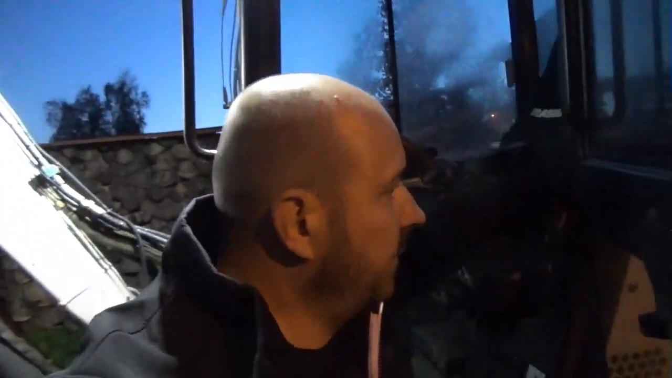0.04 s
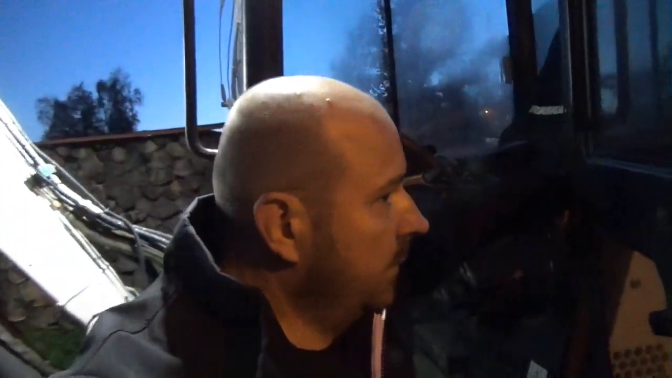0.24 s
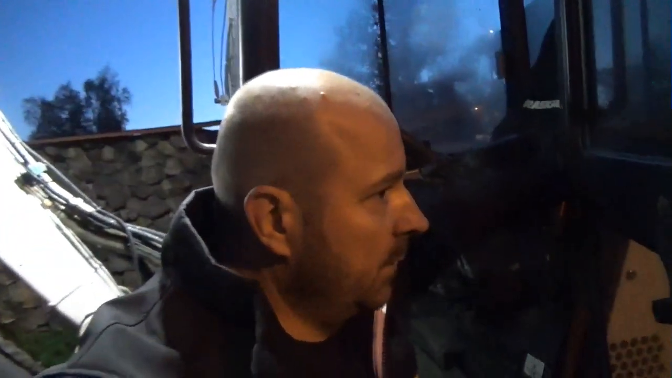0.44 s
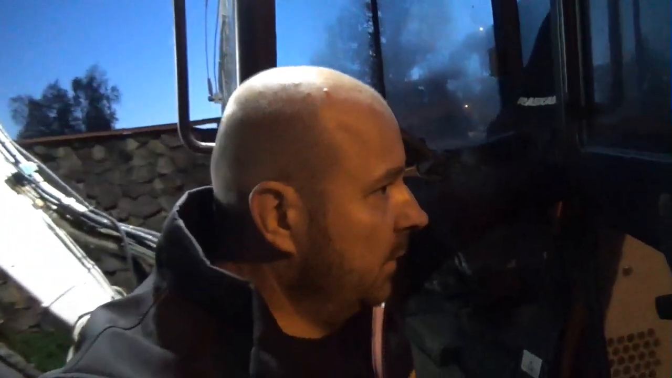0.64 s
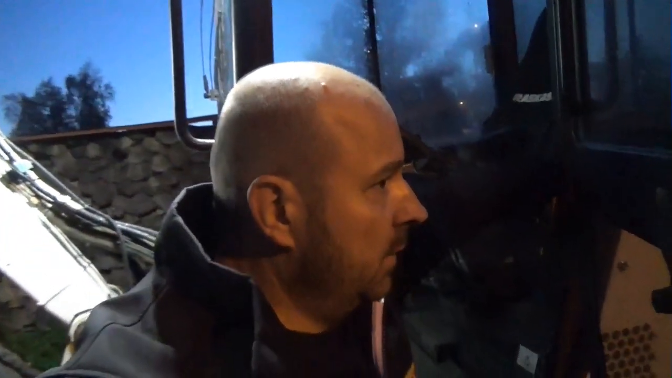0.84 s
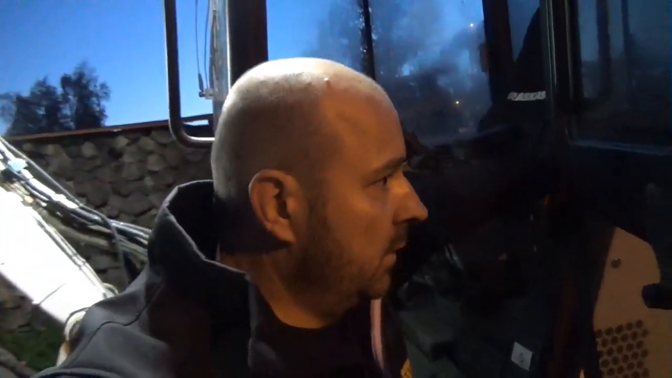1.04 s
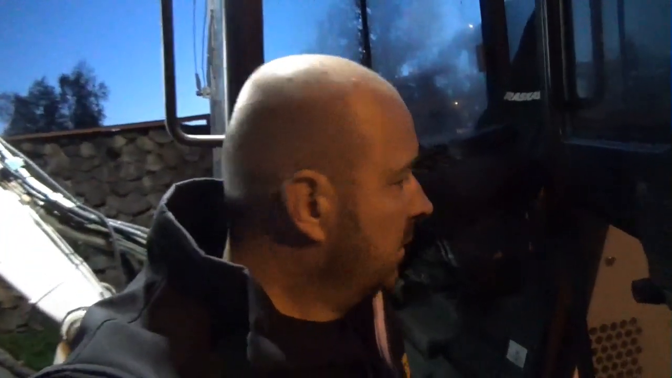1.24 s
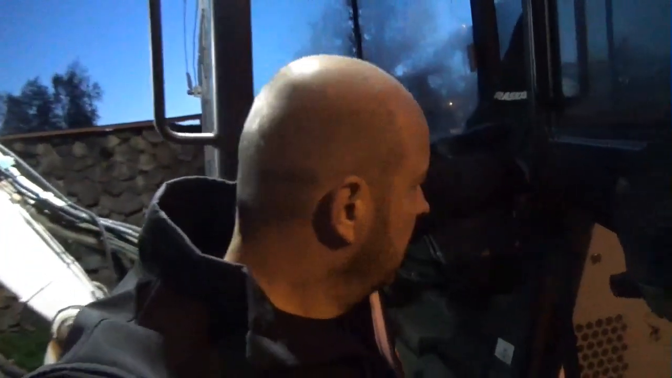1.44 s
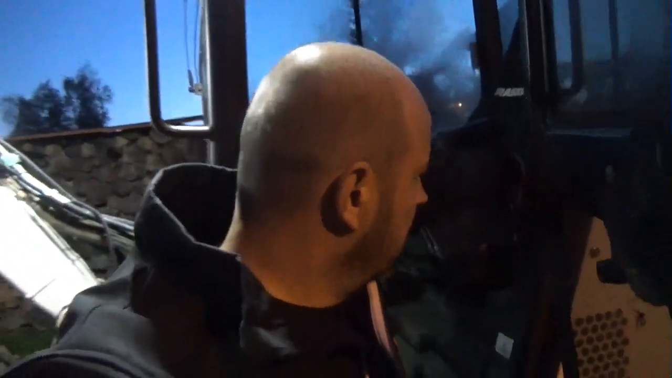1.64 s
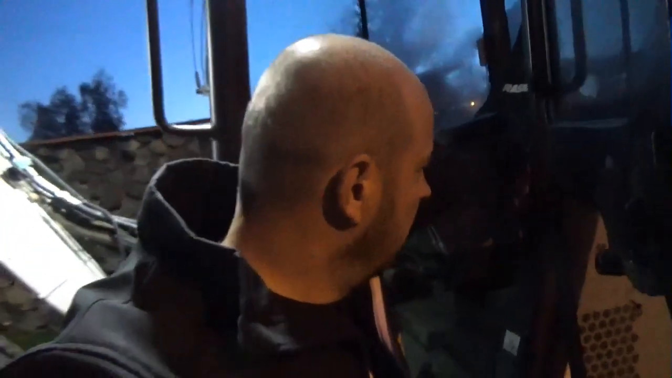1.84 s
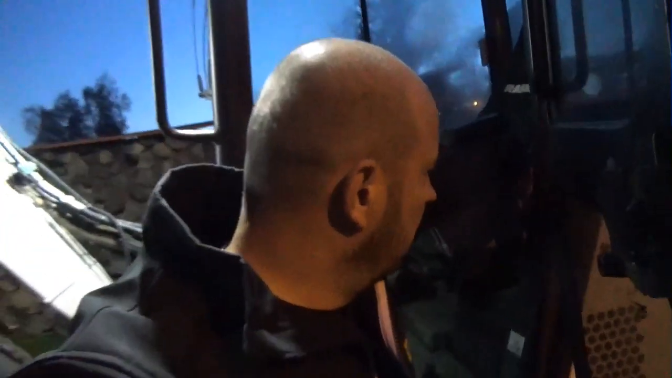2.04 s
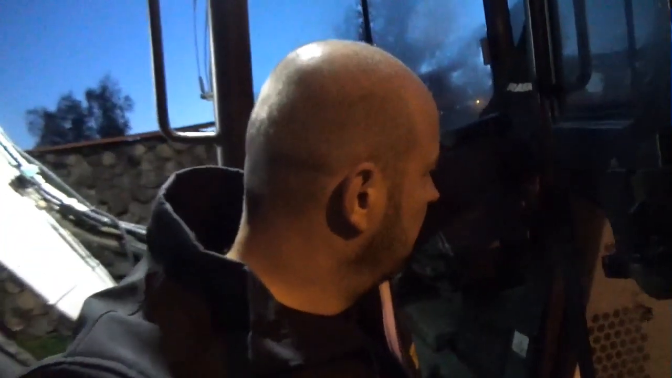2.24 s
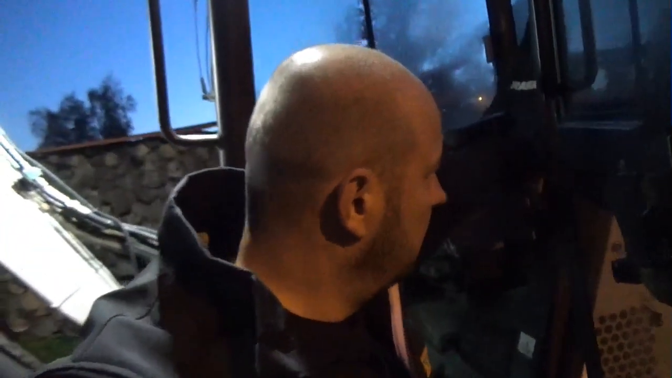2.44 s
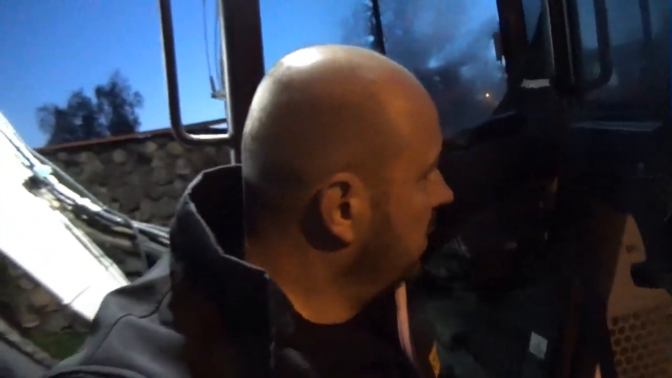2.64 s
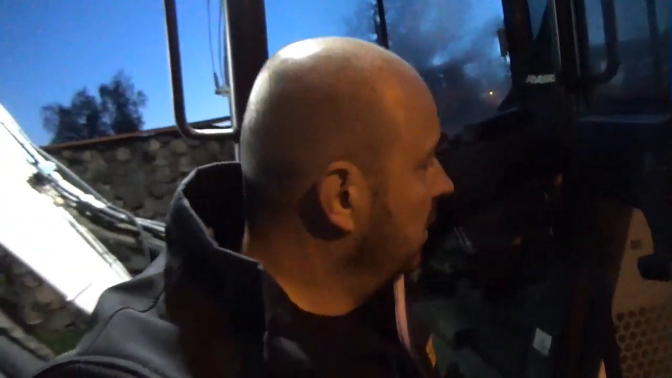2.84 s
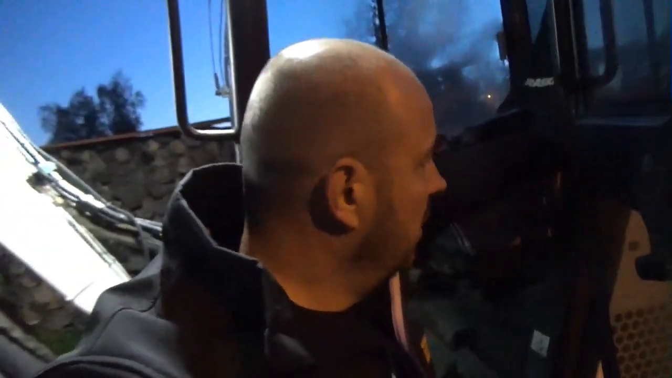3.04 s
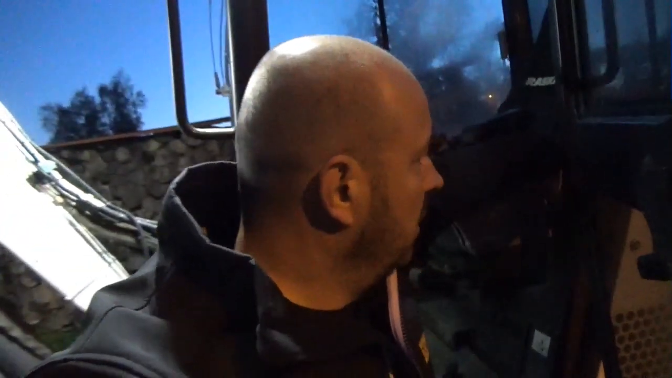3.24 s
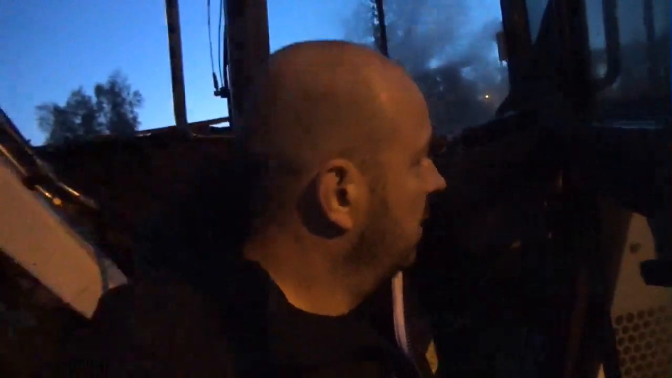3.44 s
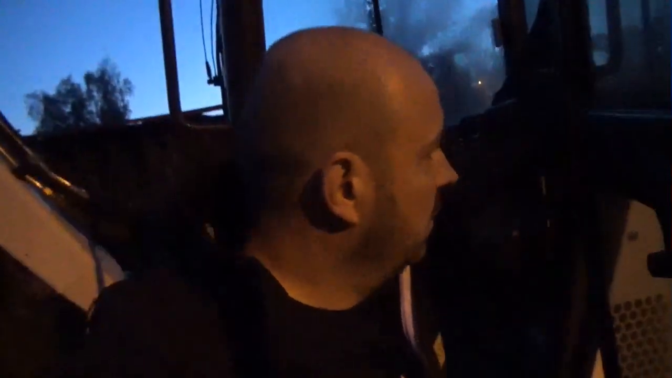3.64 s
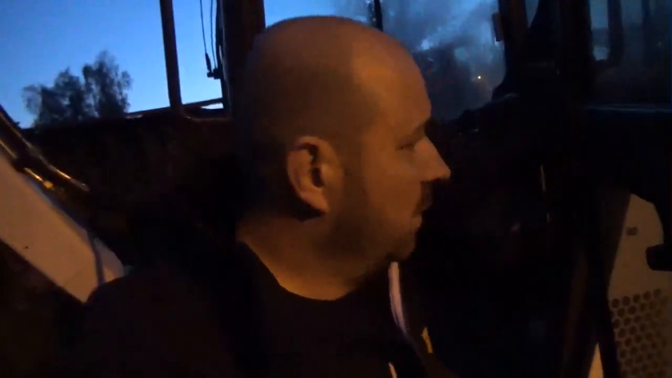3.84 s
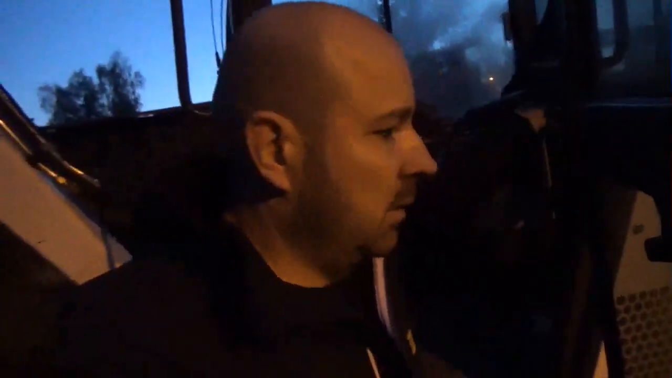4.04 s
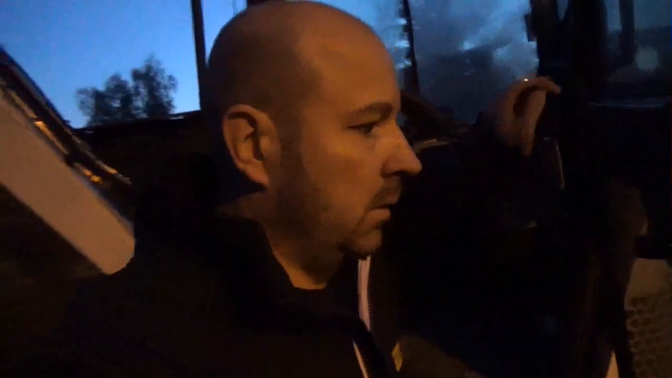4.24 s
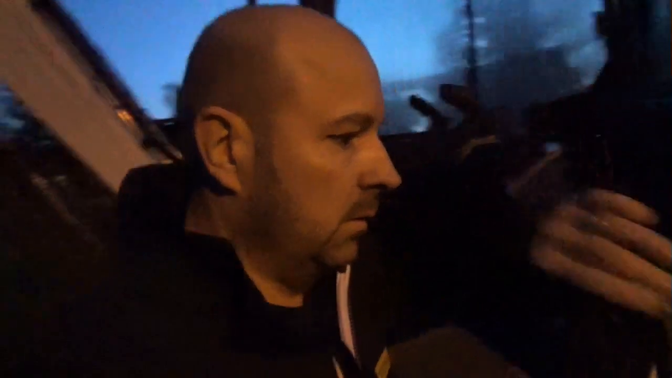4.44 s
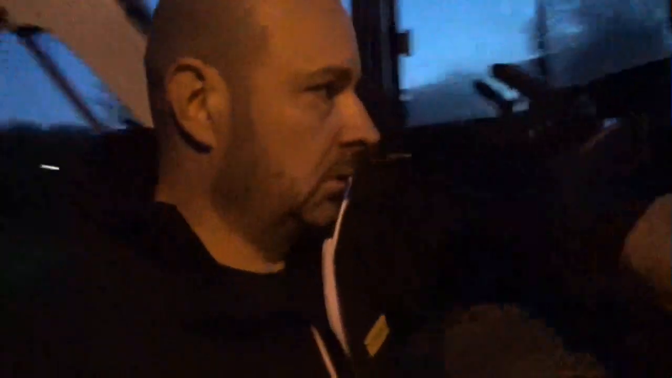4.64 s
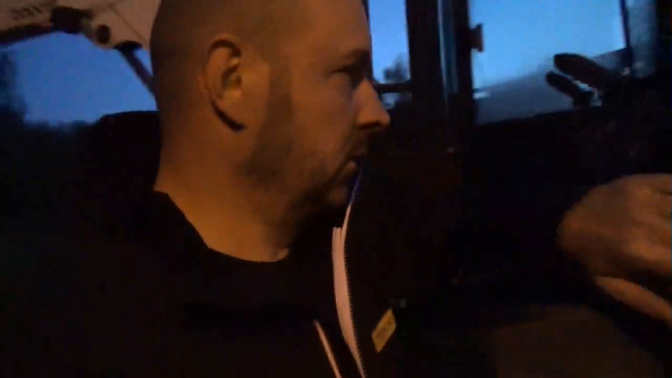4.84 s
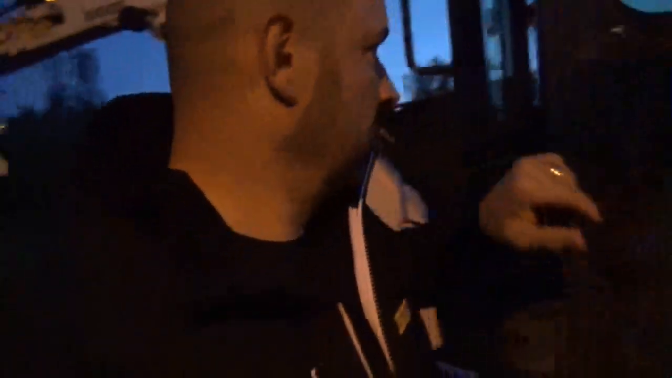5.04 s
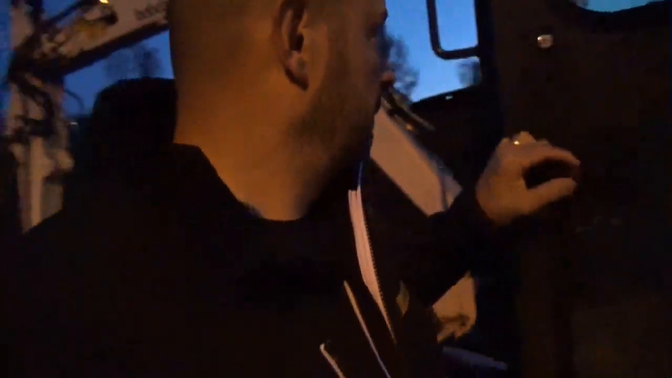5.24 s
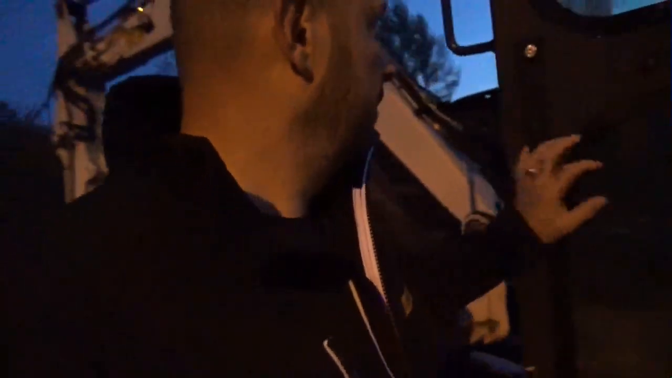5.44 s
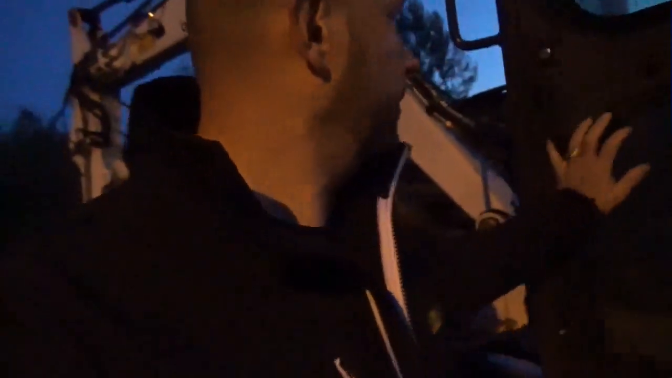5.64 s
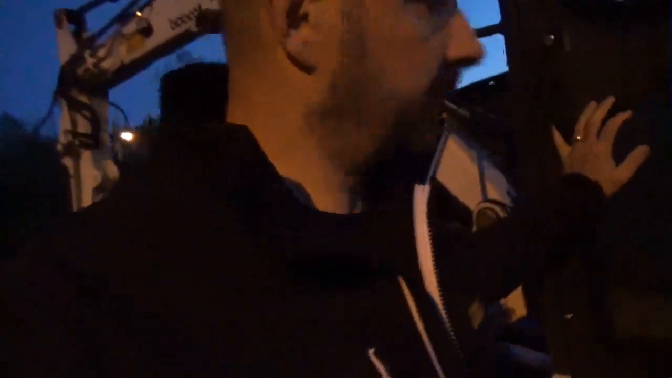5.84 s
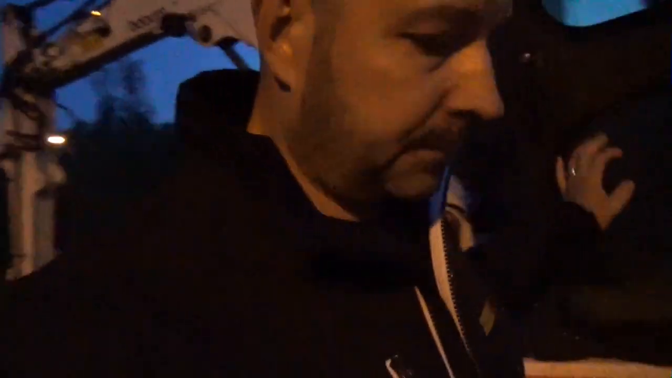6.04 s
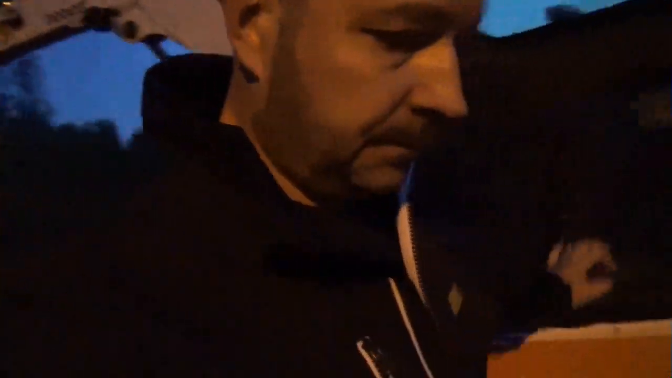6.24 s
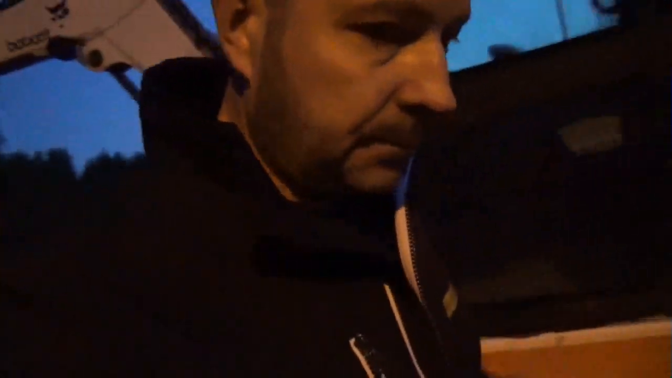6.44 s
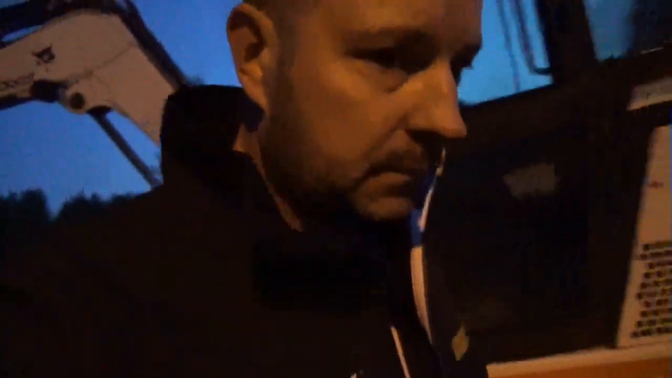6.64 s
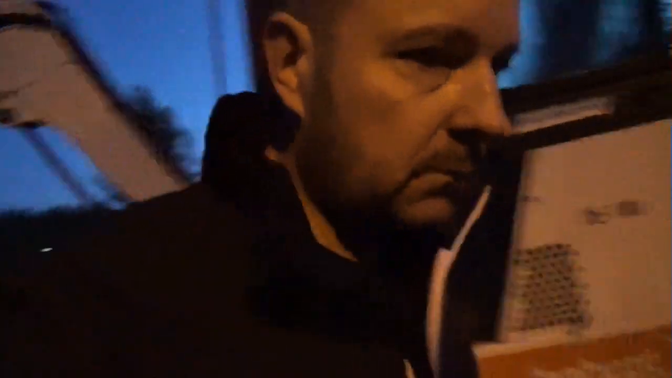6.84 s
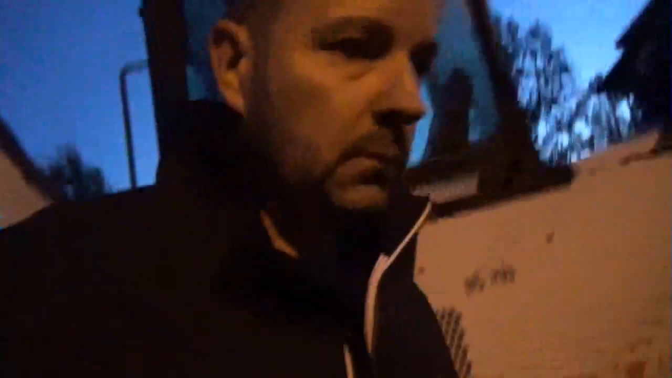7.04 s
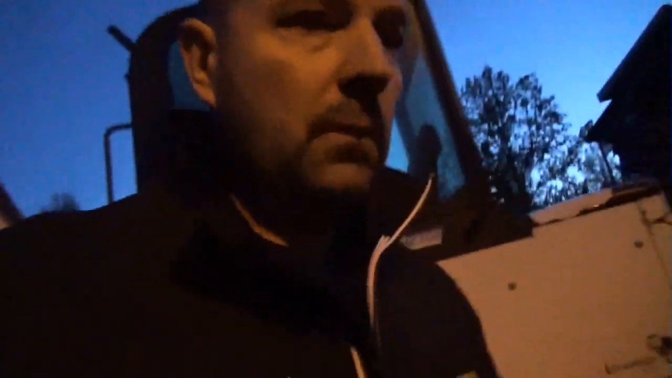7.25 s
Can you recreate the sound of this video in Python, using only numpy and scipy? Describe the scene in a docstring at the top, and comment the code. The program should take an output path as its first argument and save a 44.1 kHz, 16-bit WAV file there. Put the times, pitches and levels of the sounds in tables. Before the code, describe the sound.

Clicks and clacks in an excavator cab, then the door unlatches, squeaks and slams with a heavy boom over a low hum.

```python
"""A low hum and a far car passing, then clacks, a squeak and a booming door slam at an excavator cab.
Tyre roar sinks in pitch in the dusk air. Jacket cloth slides; switches and levers rattle and ring.
The door leaves its catch, its dry hinge rasps and slips, and the slam drives the cab's air and panels.
Last, a zip pull bounces to rest, a shoe scuffs and a few knocks follow."""
import sys
import numpy as np
from scipy import signal
from scipy.fft import irfft, next_fast_len
from scipy.io import wavfile
from scipy.ndimage import uniform_filter1d

SR = 44100
rng = np.random.default_rng(int(sys.argv[2]) if len(sys.argv) > 2 else 0)


def file_out(sig):
    """Save sig as 16-bit WAV at sys.argv[1]."""
    # one column per channel
    cols = np.atleast_2d(sig).T
    # limit, then scale
    lim = np.clip(cols, -1, 1)
    pcm = np.round(lim * 32767).astype(np.int16)
    wavfile.write(sys.argv[1], SR, pcm)


N = 322371

# Base spectra: outdoor air, cloth, tick, door shudder. Each row: frequency in Hz, relative density in dB.
AIR_DB = [(15, -49), (25, -27.5), (54, -5), (81, -4.5), (110, -3.5), (141, -4), (165, -6), (381, -8),
          (456, -8.5), (635, -9.5), (740, -9.5), (1060, -7.5), (3160, -23), (8970, -30), (11000, -38.5),
          (14300, -66), (22000, -120)]
CLOTH_DB = [(150, -7), (400, 0), (1200, -4.5), (2300, -4), (3400, -3.5), (5000, -1.5), (6200, 2), (7100, 1),
            (8000, 2.5), (9100, 0), (10400, 0.5), (11500, -10)]
TICK_DB = [(300, -17), (1200, -11), (3000, -11), (5000, -7.5), (7500, 0), (9500, 1), (11000, -6)]
SHUDDER_DB = [(20, -5), (35, -3), (60, -1), (100, 8), (150, 1.5), (220, -0.5), (340, -3.5), (480, -6.5),
              (650, -17), (900, -32), (2000, -24.5), (6000, -41.5)]
# Air envelope. Each row: time in seconds, level in dB.
AIR_LEVEL_DB = [(0, -34.5), (3.3, -32.5), (4.9, -33.5), (5.6, -34), (6.0, -39), (6.6, -37.5), (6.9, -34)]
# Outdoor balance. Each row: time in seconds, left minus right in dB.
OUTDOOR_PAN_DB = [(0, 3.5), (2.5, 5), (7.3, 0)]
# Hum partials. Each row: frequency in Hz, relative level in dB, slope in dB per second.
HUM_PARTIALS = [(80, -49.5, -.9), (99, -44.5, -0.93), (116.7, -42, -.8), (167, -47, -0.67),
                (278.5, -51.5, 0.7), (458, -60, -.5)]
# Tyre roar spectrum. Each row: multiple of the centre frequency, relative density in dB.
TYRE_DB = [(.3, -33), (.7, -9.5), (.9, 3.5), (1.05, 3), (1.25, -4.5), (1.65, -4), (2.3, -14.5), (4, -40)]
# Arm and shoulder moves. Each row: midpoint in seconds, length in seconds, peak level in dB.
CLOTH_STROKES = [ (0.024, 0.38, -40), (0.284, 0.4, -41), (0.58, 0.48, -41.5), (1.06, 0.36, -45.5),
                 (1.44, 0.32, -40), (1.81, 0.24, -42.5), (2.522, 0.64, -40), (2.963, 0.3, -45),
                 (4.188, 0.83, -36.5), (4.5, 0.061, -23), (4.6, 0.44, -34), (5.07, 0.61, -29.5),
                 (5.65, 0.34, -36), (5.86, 0.34, -40.5), (6.266, .13, -41.5), (6.586, 0.68, -46),
                 (6.925, 0.35, -30), (7.205, 0.34, -29.5)]
# Zip and cloth ticks. Each row: start in seconds, relative level in dB, mid-range boost in dB.
TICKS = [(.503, -20, 3), (2.704, -26, 17), (4.567, -19, 9), (4.6245, -18, 21), (4.884, -12.5, 18),
         (5.6266, -25, 20), (6.3582, -16.5, 5), (6.387, -22.5, 0), (6.6184, -14, -13), (6.6956, -9.5, -9),
         (6.7195, -13, -20)]

# Spectra of struck parts. Each row: frequency in Hz, relative density in dB.
SWITCH = [(88, -42), (150, -12), (262, -4), (457, 5.5), (873, -31), (1640, -7), (2350, -32), (2520, -8),
          (3240, -13), (3880, -17.5), (5660, -8.5), (8870, -1), (11000, -14), (14300, -44), (22000, -120)]
BUTTON = [(88, -44), (150, -16), (292, -8), (729, -6), (1140, -15), (1760, -6), (2260, -10), (3420, -11),
          (3880, -14), (4560, -10.5), (6890, -3.5), (9530, -4), (11000, -17), (14300, -46), (22000, -120)]
LEVER = [(59, -39), (100, -6), (464, 0.5), (674, -4), (1220, -14), (1770, -6), (2150, -8), (2570, -6.5),
         (2830, -11), (3120, -6.5), (3880, -10), (4450, -8.5), (5750, -9.5), (9220, -5.5), (11000, -9.5),
         (14300, -37), (22000, -120)]
SPRING = [(1000, -35), (2900, -7), (3550, 18), (3950, -20), (4800, -18), (9000, -19)]
CATCH = [(300, -26), (1000, -4), (2200, -4.5), (3400, -15), (4000, -26), (4600, -20), (5600, 0.5),
         (7600, 4), (8800, -7), (10000, -22)]
LOCK = [(350, -31), (600, 0.5), (1100, -9), (1570, -4.5), (2680, -5), (3140, -4.5), (4050, -15), (6130, -8),
        (7640, -15), (9980, -19), (11000, -22), (14300, -55), (22000, -120)]
STEP = [(30, -32), (71, -13), (120, -11), (402, 3), (696, -7), (942, -8.5), (1060, -21), (1160, -9.5),
        (2610, -18.5), (3220, -17.5), (3670, -23.5), (7680, -16), (11000, -15.5), (14300, -46),
        (22000, -120)]
PANEL = [(60, -19), (130, -2.5), (220, 3.5), (450, -13.5), (700, -6), (1000, -5), (1600, -23), (3000, -23),
         (5500, -25.5), (10000, -33)]
# Blows. Each row: start in seconds, level in dB, edge T60 in seconds, body boost in dB, part spectrum.
BLOWS = [ (0.3258, -18, 0.09, 1.5, SWITCH), (.7125, -13, 0.085, -5, BUTTON), (.7135, -19, 0.028, 0, SPRING),
         (3.4672, -13.3, 0.092, 2.5, LEVER), (3.5460, -12.8, 0.105, -1.5, LEVER),
         (3.5465, -17, 0.022, 6, SPRING), (3.665, -30, 0.06, 9, PANEL), (4.7432, -11, 0.12, 0, CATCH),
         (4.7493, -16.5, 0.11, -7, LOCK), (5.716, -23.5, 0.057, 9, LOCK), (6.103, -21.5, 0.07, 32, STEP),
         (6.992, -13.5, 0.016, -6, LOCK), (7.015, -19.5, 0.027, -7, PANEL),
         (7.047, -13, 0.042, -10.5, PANEL)]
# First blows of door latch and shoe scuff; same columns.
LATCH_BLOW = (5.733, -6, .08, -8, LOCK)
SCUFF_BLOW = (6.838, -13, 0.083, -7, STEP)
# Modes: small steel parts, door catch, shut cab.
# Each row: frequency in Hz, relative level in dB, T60 in seconds.
STEEL_MODES = [(1945, -21, 0.061), (3300, -20.5, 0.14), (3505, -20.5, 0.14), (5820, -14, 0.046),
               (7000, -16, .05), (9070, -15, 0.027)]
CATCH_MODES = [(1000, 2, .17), (1970, 2, .15), (2490, -3, .13), (5780, -1, .13), (6760, -1, .13)]
CAB_MODES = [(41.3, -25, 1), (80.3, -22, 0.9), (94.9, -17, 1.05), (121.8, -18, 0.82), (143.2, -1, 0.47),
             (160, -12.5, 0.87), (197.6, -18.5, 0.64), (266.4, -23, 0.54), (282, -21.5, 0.56),
             (354.8, -21.5, .35), (408, -26, 0.22), (498.6, -23, 0.2), (548, -27, 0.22), (569, -25, 0.47)]
# Hinge resonances. Each row: centre in Hz, width in Hz, relative level in dB.
RASP_BANDS = [(4400, 160, -3.5), (6400, 370, -4), (7950, 230, 1), (10500, 700, -6.5)]
# Hinge rub over the swing. Each row: time in seconds, level in dB.
RASP_LEVEL_DB = [(4.87, -70), (4.94, -30.5), (5.12, -32), (5.26, -44), (5.37, -37.5), (5.55, -68)]
# Hinge slips. Each row: start in seconds, length in seconds, pitch in Hz, level in dB.
HINGE_SLIPS = [ (5.076, .03, 8060, -12), (5.102, .007, 7970, -11.5), (5.113, .006, 7850, -13),
               (5.215, .012, 2800, -25), (5.225, 0.019, 2482, -14.5), (5.2442, .011, 3050, -6),
               (5.346, 0.0077, 3104, -17), (5.357, .0062, 3020, -18.5), (5.364, 0.032, 2487, -16.5)]


def amp(db):
    """dB to gain."""
    return 10 ** (np.asarray(db) / 20)


def unit_rms(x):
    """Scale to RMS 1."""
    return x / np.sqrt(np.mean(x ** 2) + 1e-20)


def spectrum_db(rows, hz):
    """Interpolate a spectrum over log frequency."""
    row_hz, db = np.transpose(rows)
    return np.interp(np.log(hz + 1e-6), np.log(row_hz), db)


def curve_db(rows, t):
    """Interpolate a curve over time."""
    return np.interp(t, *np.transpose(rows))


def panned(x, pan_db):
    """Pan by left minus right level."""
    return x * amp(np.array([[.5], [-.5]]) * pan_db)


def add(mix, start_s, sound):
    """Mix in a stereo sound."""
    span = mix[:, round(start_s * SR):][:, :sound.shape[1]]
    span += sound[:, :span.shape[1]]


def noise(size, colour_db, spread):
    """Stereo noise, RMS 1; spread is the side gain, which falls off in the bass."""
    hz = np.fft.rfftfreq(2 * next_fast_len(size // 2 + 1), 1 / SR)
    mid, side = np.exp(2j * np.pi * rng.random((2, len(hz))))
    side = side * spread * hz / np.hypot(hz, 110)
    return unit_rms(irfft(np.array([mid + side, mid - side]) * amp(colour_db(hz)))[:, :size])


def wander(size, rate_hz):
    """Smooth random motion, RMS 1, three points per cycle."""
    position = np.arange(size) * 3 * rate_hz / SR
    points = rng.standard_normal(int(position[-1]) + 2)
    k = position.astype(int)
    blend = np.sin(np.pi / 2 * (position - k)) ** 2
    return unit_rms(points[k] * (1 - blend) + points[k + 1] * blend)


def attack(t, rise_s):
    """Exponential rise to 1."""
    return 1 - np.exp(-t / rise_s)


def decay(t, t60_s, hold_s=0):
    """Hold, then fall 60 dB per T60."""
    return np.exp(-np.log(1000) * np.maximum(t - hold_s, 0) / t60_s)


def air(t, swell_db=1.27):
    """Broad outdoor noise, gently swelling, with treble and bass shelved down."""
    def colour_db(hz):
        treble_cut_db = 7 * np.clip((hz - 2500) / 3000, 0, 1)
        bass_cut_db = 3 / (1 + (hz / 150) ** 2)
        return spectrum_db(AIR_DB, hz) - treble_cut_db - bass_cut_db
    return noise(N, colour_db, 0.19) * amp(curve_db(AIR_LEVEL_DB, t) + swell_db * wander(N, 4.2))


def hum(t, gain_db=1.9, waver=0.53, drift_hz=2):
    """Low partials, each wavering in level and pitch."""
    out = np.zeros(N)
    for hz, db, slope_db_per_s in HUM_PARTIALS:
        envelope = amp(db + gain_db + slope_db_per_s * t) * (1 + waver * wander(N, 12))
        phase = 2 * np.pi * np.cumsum(hz + drift_hz * wander(N, 3)) / SR
        out += envelope * np.sin(phase)
    return out


def passing_car(t, peak_db=-32.5, near_s=0.57, leave_s=1.85, rise_db_per_s=14, fade_db_per_s=6,
                pass_hz=984, sink_hz=103, pass_s=1.48, glide_s=0.9):
    """Tyre roar nears, holds and fades, sinking in pitch as the car passes."""
    hz, frame_s, bins = signal.stft(noise(N, np.zeros_like, 0.34), SR, nperseg=1024)
    centre_hz = pass_hz - sink_hz * np.tanh((frame_s - pass_s) / glide_s)
    bins *= amp(spectrum_db(TYRE_DB, hz[:, None] / centre_hz))
    roar = signal.istft(bins, SR)[1][:, :N]
    drop_db = rise_db_per_s * np.maximum(near_s - t, 0) + fade_db_per_s * np.maximum(t - leave_s, 0)
    return unit_rms(roar) * amp(peak_db - drop_db)


def outdoors(reflection_gain=0.11):
    """Air, hum and car; the cab and digging arm reflect air and car."""
    t = np.arange(N) / SR
    ambience, drone = air(t), hum(t)
    far = ambience + passing_car(t)
    delays_s = rng.uniform(0.002976, .025, 4)
    reflections = sum(np.roll(far, round(delay_s * SR), axis=1) for delay_s in delays_s)
    return panned(far + reflection_gain * reflections + drone, curve_db(OUTDOOR_PAN_DB, t))


def jacket(rest_db=-51, speed_exponent=0.98, drag_db=1.0, grain_db=1.07):
    """Cloth on cloth: level follows sliding speed; threads catch in fine grains."""
    t = np.arange(N) / SR
    power = np.full(N, amp(rest_db) ** 2)
    for middle_s, length_s, db in CLOTH_STROKES:
        moving = abs(t - middle_s) < length_s / 2
        speed = np.cos(np.pi * (t[moving] - middle_s) / length_s)
        power[moving] += (amp(db) * speed ** speed_exponent) ** 2
    roughness = amp(drag_db * wander(N, 20) + grain_db * wander(N, 300))
    return noise(N, lambda hz: spectrum_db(CLOTH_DB, hz), 0.29) * np.sqrt(power) * roughness


def zip_bounces(start_s=6.780, gap_s=.011, gap_ratio=.76, first_db=-16.5, grow_db=1.3, boost_db=-15):
    """Tick rows for a zip pull bouncing to rest: gaps shrink, levels grow."""
    starts_s = [start_s + gap_s * sum(gap_ratio ** j for j in range(k)) for k in range(6)]
    return [(s, first_db + k * grow_db, boost_db) for k, s in enumerate(starts_s)]


def ticks(gain_db=3, t60_s=0.0062, tail_db=-22, tail_t60_s=0.12, boost_hz=3300, width_oct=0.49):
    """Tiny close snaps of zip pull and cloth, each with a faint tail."""
    out, t = np.zeros((2, N)), np.arange(2 ** 11) / SR
    envelope = decay(t, t60_s) + amp(tail_db) * decay(t, tail_t60_s)
    for start_s, db, boost_db in TICKS + zip_bounces():
        def colour_db(hz):
            offset_oct = np.log2((hz + 1) / boost_hz)
            return spectrum_db(TICK_DB, hz) + boost_db * np.exp(-(offset_oct / width_oct) ** 2)
        add(out, start_s, amp(db + gain_db) * noise(len(t), colour_db, 0.15) * envelope)
    return out


def stutter(blow, count, body_step_db, t60_ratio, gap_s=.0165, fall_db=2.5):
    """Blow rows for a part catching repeatedly, each time weaker, shorter and duller."""
    start_s, db, t60_s, body_db, part = blow
    return [(start_s + k * gap_s, db - k * fall_db, t60_s * t60_ratio ** k,
             body_db + k * body_step_db, part) for k in range(count)]


def clacks(body_hz=600, body_t60_ratio=2.1, rattle_share=0.094, chatter_db=1.7, ripple_db=3):
    """Struck parts rattle and decay: sharp edge, longer low body, ring of small steel parts."""
    out, t = np.zeros((2, N)), np.arange(2 ** 13) / SR
    lowpass = signal.butter(2, body_hz, fs=SR)
    latch = stutter(LATCH_BLOW, count=3, body_step_db=20, t60_ratio=0.93)
    scuff = stutter(SCUFF_BLOW, count=4, body_step_db=1.0, t60_ratio=0.94)
    for start_s, db, t60_s, body_db, part in BLOWS + latch + scuff:
        def colour_db(hz):
            close_modes = unit_rms(uniform_filter1d(rng.standard_normal(len(hz)), size=18))
            return spectrum_db(part, hz) + ripple_db * close_modes + body_db / (1 + (hz / body_hz) ** 2)
        burst = noise(len(t), colour_db, 0.23)
        low = signal.filtfilt(*lowpass, burst)
        rattle_s = rattle_share * t60_s
        edge = (burst - low) * decay(t, t60_s, rattle_s) * amp(chatter_db * wander(len(t), 400))
        body = low * decay(t, t60_s * body_t60_ratio, rattle_s) * attack(t, rise_s=0.002)
        ring = sum(amp(mode_db) * decay(t, mode_t60_s) * np.sin(2 * np.pi * hz * rng.normal(1, 0.0063) * t)
                   for hz, mode_db, mode_t60_s in STEEL_MODES)
        ring *= amp(-2.7 * max(body_db, 0))  # dull blows ring less
        add(out, start_s, panned(amp(db) * (edge + body + ring), pan_db=-0.6))
    return out


def door_catch(start_s=4.744, gain_db=-21):
    """The steel catch rings freely once the door leaves it."""
    out, t = np.zeros((2, N)), np.arange(2 ** 13) / SR
    ring = sum(amp(db) * decay(t, t60_s) * np.sin(2 * np.pi * hz * t) for hz, db, t60_s in CATCH_MODES)
    add(out, start_s, panned(amp(gain_db) * ring, pan_db=0))
    return out


def hinge_rasp(judder_db=1.5):
    """The dry hinge rubs, driving narrow resonances."""
    def colour_db(hz):
        power = sum(amp(db) ** 2 / (1 + (2 * (hz - centre_hz) / width_hz) ** 2)
                    for centre_hz, width_hz, db in RASP_BANDS)
        return 10 * np.log10(power)
    t = np.arange(N) / SR
    return noise(N, colour_db, .2) * amp(curve_db(RASP_LEVEL_DB, t) + judder_db * wander(N, 40))


def hinge_squeaks(door_slows_s=5.3, soften_s=.003, flutter=0.002, ring_db=-21, pan_db=-2.0):
    """Slips sing and ring on: bending up as the door gathers speed, down and harsher as it slows."""
    out, t = np.zeros((2, N)), np.arange(2 ** 12) / SR
    for start_s, length_s, hz, db in HINGE_SLIPS:
        bend, overtone_db = (.005, -24) if start_s < door_slows_s else (-.012, -19)
        size = round((length_s + 2 * soften_s) * SR)
        pitch_hz = hz * (1 + np.linspace(-bend, bend, size) + flutter * wander(size, 150))
        phase = 2 * np.pi * np.cumsum(pitch_hz) / SR
        tone = np.sin(phase) + amp(overtone_db) * (np.sin(2 * phase) + amp(-5) * np.sin(3 * phase))
        slip = np.sqrt(2) * amp(db) * tone * signal.windows.tukey(size, .85)
        add(out, start_s - soften_s, panned(slip, pan_db))
        ring = np.sin(2 * np.pi * hz * t) * decay(t, t60_s=.12) * attack(t, soften_s)
        add(out, start_s + length_s, panned(amp(db + ring_db) * ring, pan_db))
    return out


def door_slam(start_s=5.739, boom_db=2, shudder_db=-11, pitch_lift=0.049, relax_s=0.054):
    """The door squeezes its seal: cab air and panels boom, the frame shudders."""
    out, t = np.zeros((2, N)), np.arange(SR) / SR
    warped_s = t + pitch_lift * relax_s * attack(t, relax_s)  # squeezed seal is stiffer: starts sharp
    boom = sum(amp(db) * decay(t, t60_s, hold_s=0.062) * np.sin(2 * np.pi * hz * warped_s)
               for hz, db, t60_s in CAB_MODES)
    boom *= amp(boom_db) * attack(t, rise_s=0.012)
    shudder = noise(len(t), lambda hz: spectrum_db(SHUDDER_DB, hz), 0.43)
    shudder *= amp(shudder_db) * attack(t, rise_s=0.0014) * decay(t, t60_s=0.41, hold_s=0.076)
    add(out, start_s, panned(boom + shudder, pan_db=-1))
    return out


def cab_echo(x, t60_s=0.15, wet_db=-19):
    """Short, bright tail off glass and steel."""
    t = np.arange(2 ** 14) / SR
    tail = noise(len(t), np.zeros_like, 0.47) * decay(t, t60_s) * attack(t, rise_s=0.0074)
    return amp(wet_db) * signal.fftconvolve(x, tail / np.linalg.norm(tail[0]), axes=1)[:, :N]


def scene(hinge_send_db=1):
    """Clacks, catch and hinge echo in the cab; the rest is dry."""
    hits = clacks() + door_catch()
    hinge = hinge_rasp() + hinge_squeaks()
    direct = outdoors() + jacket() + ticks() + door_slam() + hits + hinge
    return direct + cab_echo(hits + amp(hinge_send_db) * hinge)


def record(dry):
    """Soft microphone overload on the slam, then a low-pass."""
    clipped = dry / (1 + dry ** 6) ** (1 / 6)
    cutoff_hz = 11150
    lowpass = signal.firwin(401, cutoff_hz, window=("kaiser", 7), fs=SR)
    return signal.oaconvolve(clipped, lowpass[None], "same")


dry = scene()
out = record(dry)
file_out(out)
```